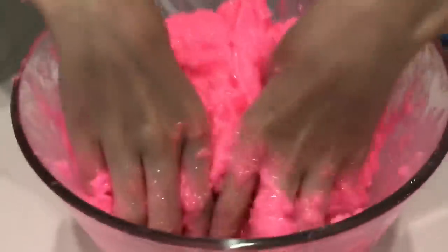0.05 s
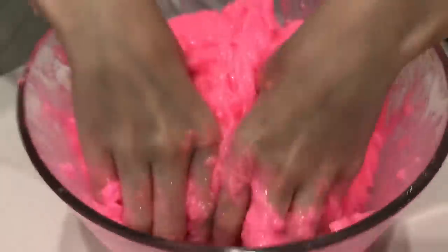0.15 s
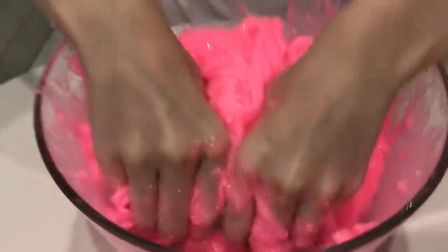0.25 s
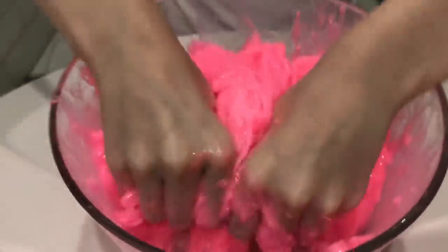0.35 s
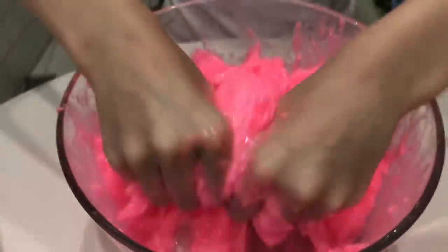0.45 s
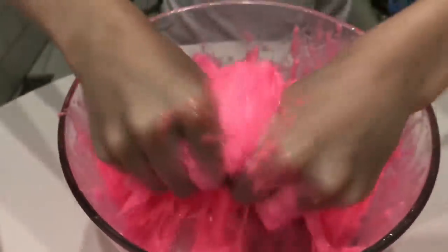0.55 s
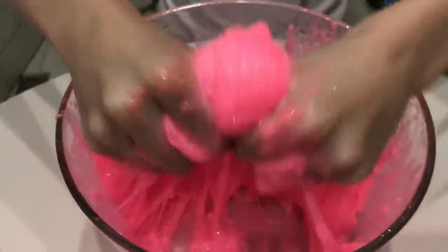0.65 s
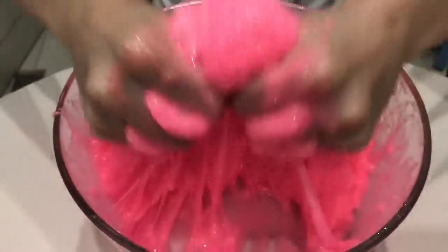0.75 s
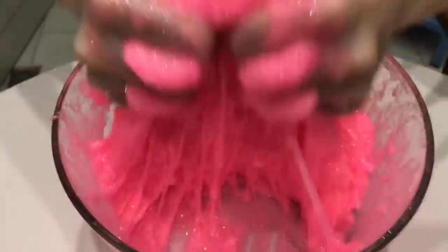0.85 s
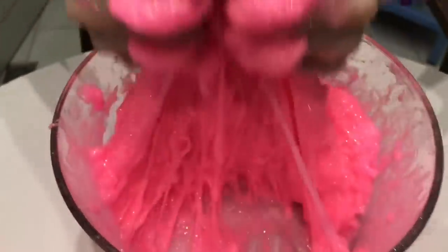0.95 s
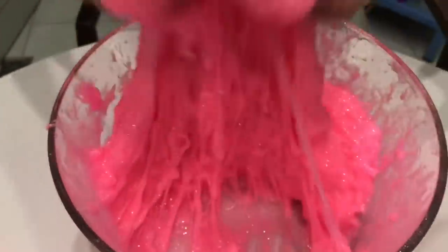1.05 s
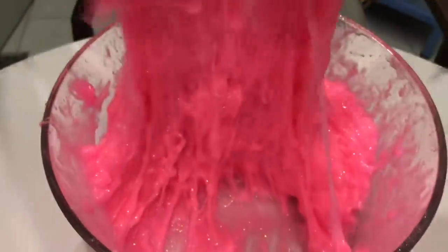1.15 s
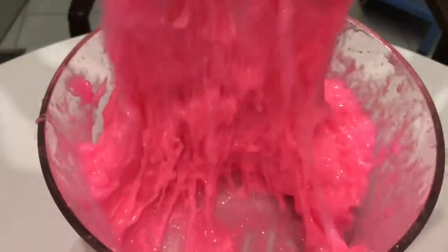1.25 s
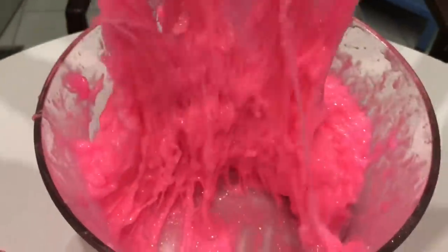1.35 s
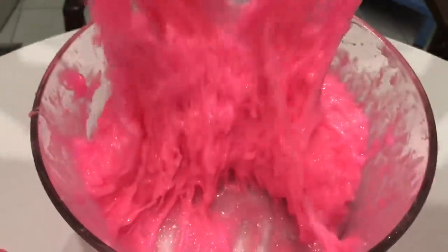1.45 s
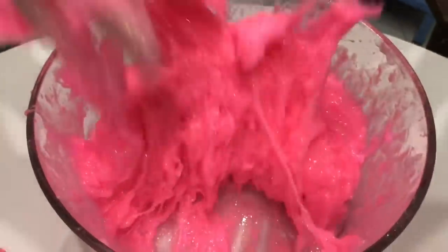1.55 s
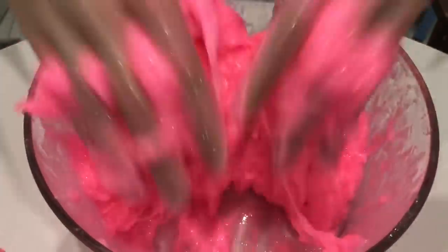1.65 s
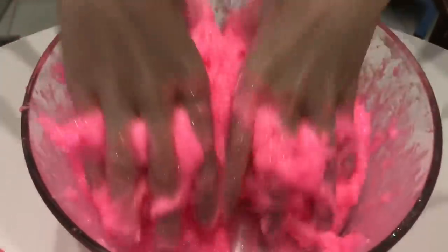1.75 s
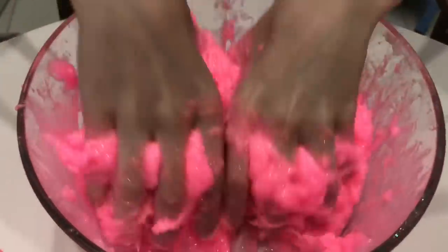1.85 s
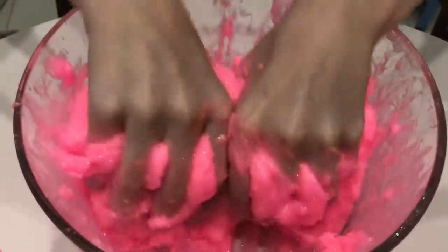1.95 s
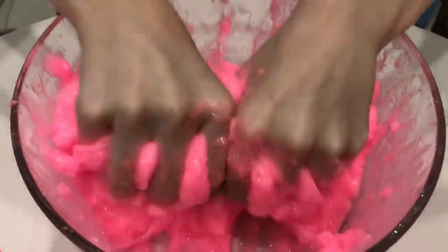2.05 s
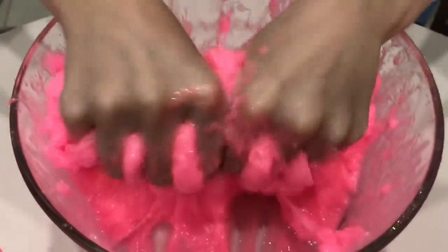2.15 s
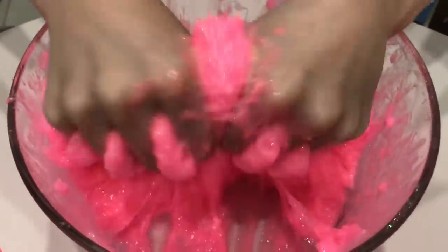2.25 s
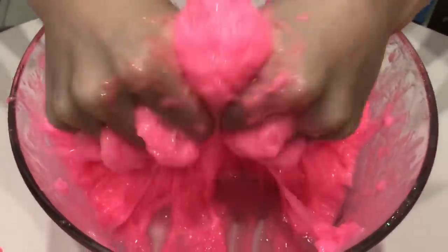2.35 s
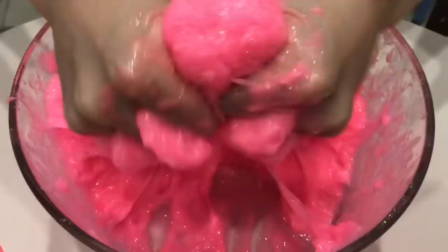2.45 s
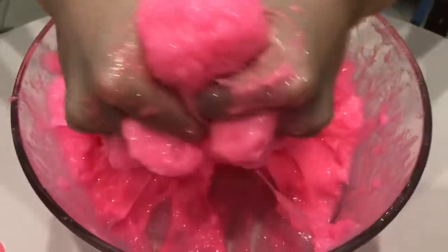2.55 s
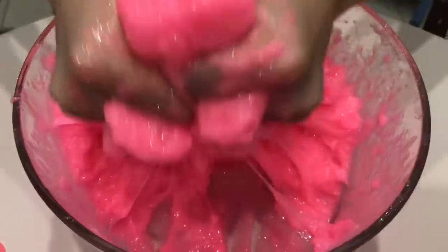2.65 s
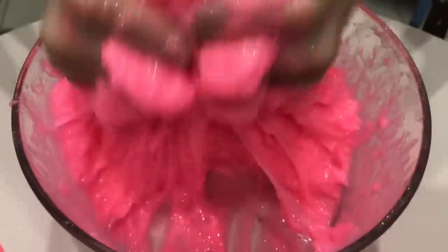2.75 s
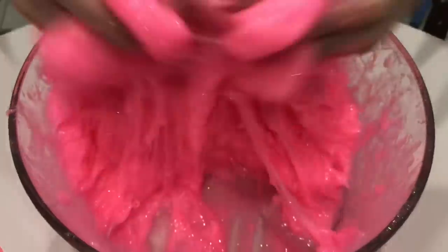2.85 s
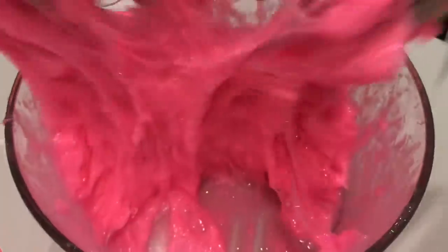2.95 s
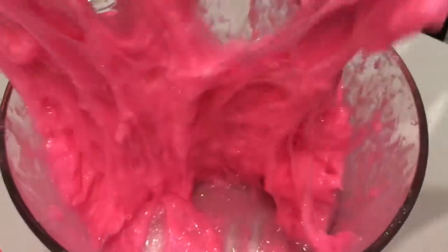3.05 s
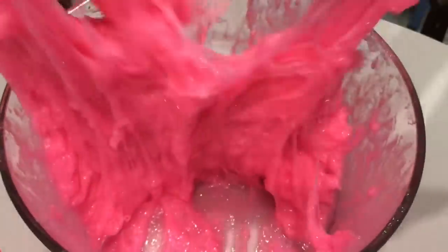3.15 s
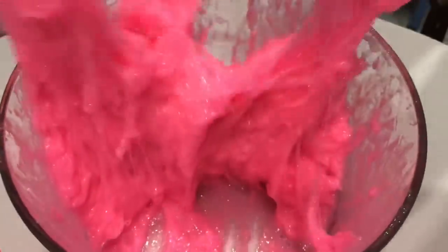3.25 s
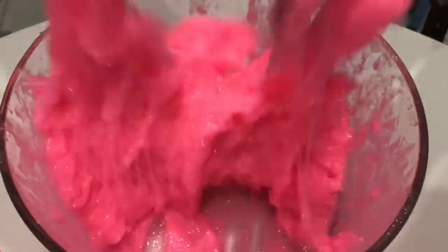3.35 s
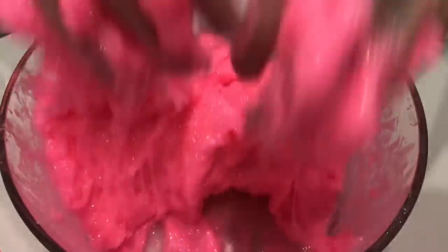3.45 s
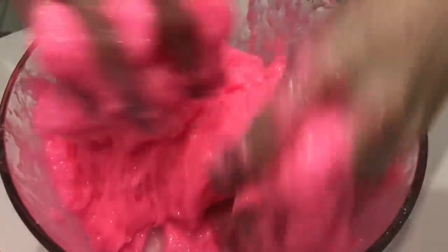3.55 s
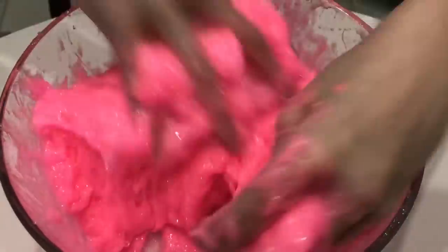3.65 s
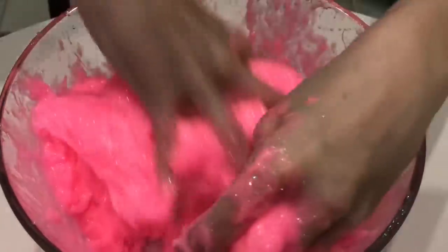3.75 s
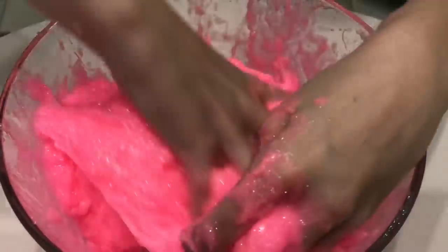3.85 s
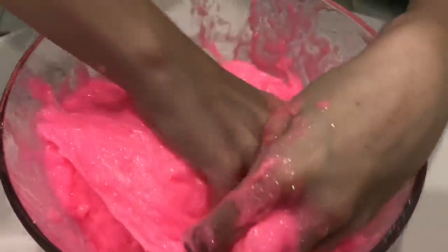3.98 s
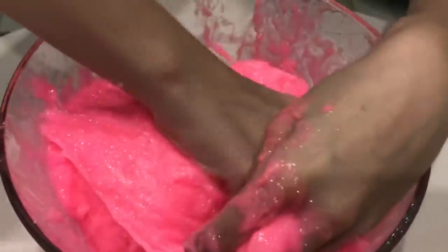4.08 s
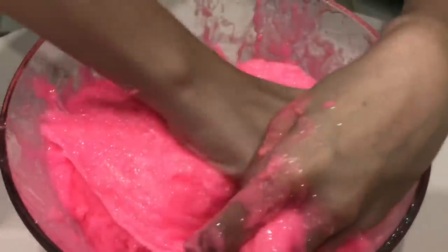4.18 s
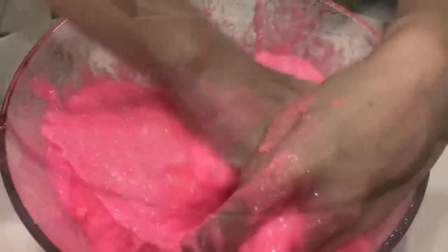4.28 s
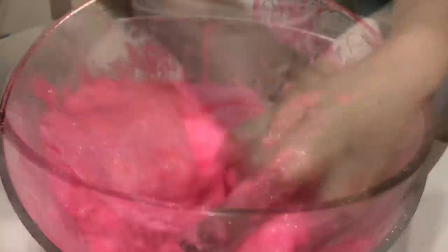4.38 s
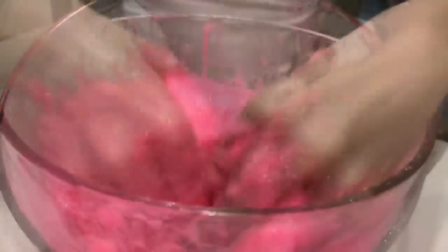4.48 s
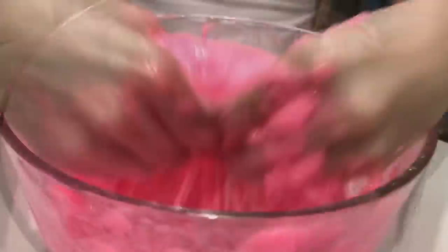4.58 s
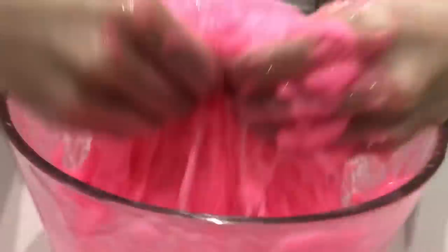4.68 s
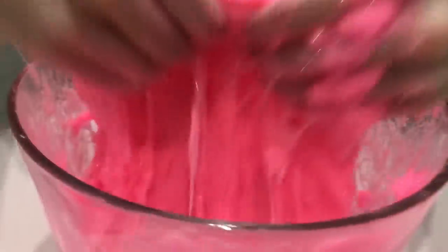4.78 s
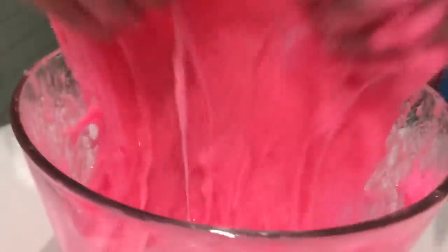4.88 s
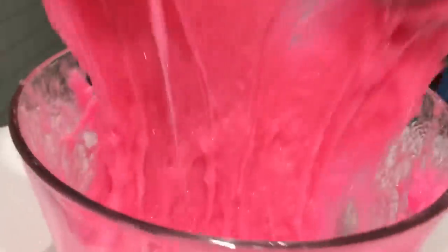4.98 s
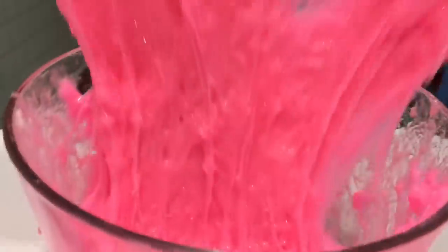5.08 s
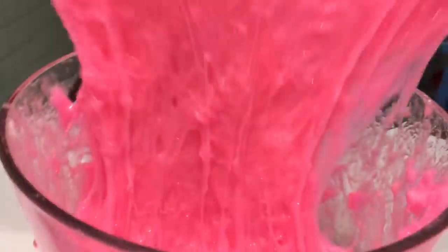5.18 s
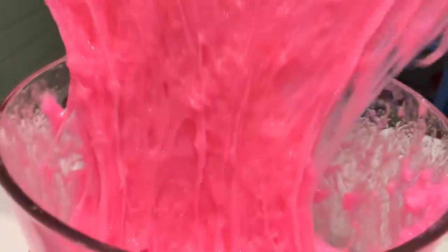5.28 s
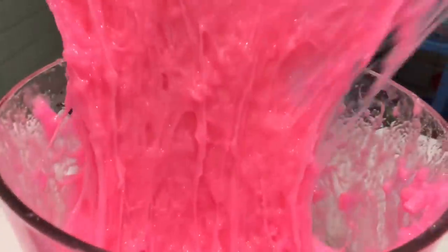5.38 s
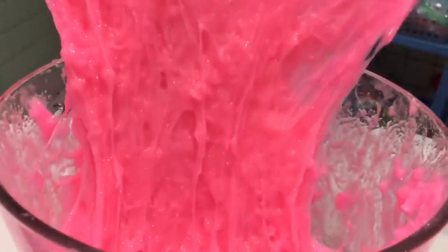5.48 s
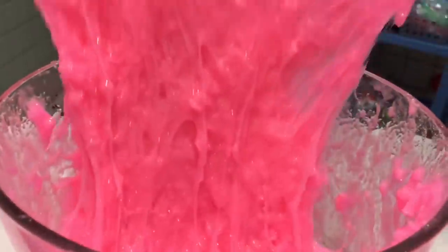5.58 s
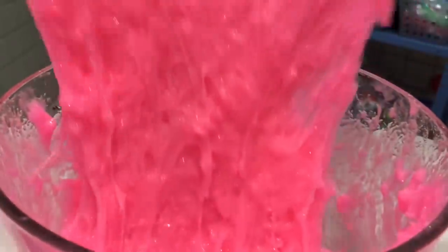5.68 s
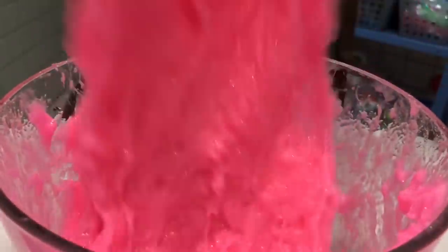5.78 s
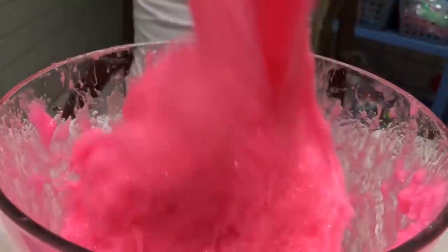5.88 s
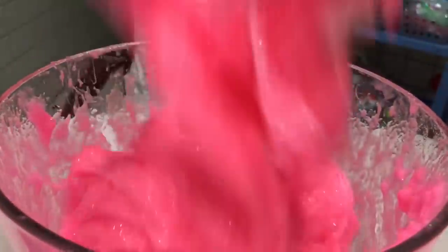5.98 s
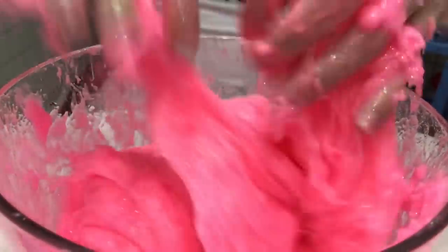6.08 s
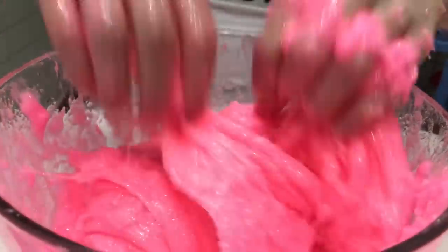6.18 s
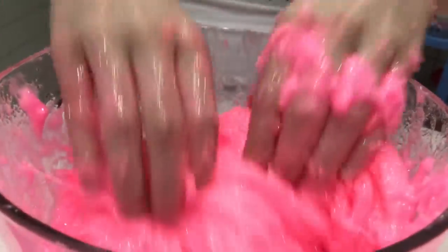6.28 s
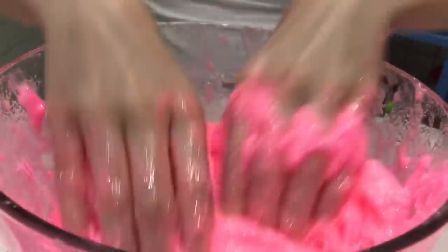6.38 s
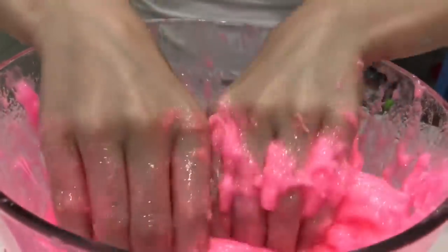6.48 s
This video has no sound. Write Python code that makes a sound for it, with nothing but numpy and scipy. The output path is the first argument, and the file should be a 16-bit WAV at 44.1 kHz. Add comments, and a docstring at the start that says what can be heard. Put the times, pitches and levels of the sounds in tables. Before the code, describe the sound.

Two hands knead thick slime in a large bowl, close to the microphone in a small room. Tiny bubbles crackle in waves with each squeeze, while trapped air bursts in wet pops and sticky threads tick apart. A soft thud comes as the lump is pushed down. Later a pull drags the bowl on the table with a low judder, then a loud pop leads into a last squeeze.

```python
"""Two hands squeeze, fold and stretch thick slime in a large bowl, close up in a small room.
From the start, trapped air bursts in wet pops that rattle between the bowl's walls, over a crackle
of tiny bubbles and the ticks of parting threads. At 1.9 s the lump is pushed down with a soft thud;
near 4 s the hands dig in again. Pulls drag the bowl on the table: it judders with a low groan, most
around 5 s. A loud pop at 6.2 s leads into a last squeeze."""
import sys
import numpy as np
from scipy import signal
from scipy.fft import rfft, irfft
from scipy.io import wavfile
from scipy.ndimage import uniform_filter1d

SR = 44100
rng = np.random.default_rng(int(sys.argv[2]) if len(sys.argv) > 2 else 0)


def transcribe(signal):
    """Save signal, clipped to [-1, 1], as a 16-bit WAV file at the path in sys.argv[1]."""
    frames = np.atleast_2d(signal).T
    limited = np.clip(frames, -1, 1)
    pcm = np.round(limited * 32767).astype(np.int16)
    wavfile.write(sys.argv[1], SR, pcm)


N = 287541
TIME_S = np.arange(N) / SR
BURST_S = 0.002  # pop and tick levels are averages over this time


def amp(db):
    return 10 ** (np.asarray(db) / 20)


def unit_rms(x):
    return x / np.sqrt(np.mean(x ** 2) + 1e-20)


def unit_energy(x):
    return x / np.sqrt(np.sum(x ** 2) + 1e-20)


def at_hz(points, hz):
    """Interpolates (Hz, value) rows on a log-frequency axis."""
    points_hz, values = np.transpose(points)
    return np.interp(np.log(hz + 1), np.log(points_hz + 1), values)


def coloured(x, points):
    return irfft(rfft(x) * amp(at_hz(points, np.fft.rfftfreq(len(x), 1 / SR))), len(x))


def highpass(x, hz):
    return signal.sosfilt(signal.butter(2, min(hz, SR / 3), "high", fs=SR, output="sos"), x)


def lowpass(x, hz):
    return signal.lfilter(*signal.butter(2, min(hz, SR * 3 / 7), fs=SR), x)


def wander(top_hz):
    """Slow noise of rms 1."""
    return unit_rms(irfft(rfft(rng.standard_normal(N)) * (np.fft.rfftfreq(N, 1 / SR) < top_hz), N))


def add(mix, start_s, sound):
    part = mix[max(round(start_s * SR), 0):][:len(sound)]
    part += sound[:len(part)]


def stroke(start_s, hold_s, attack_s, release_s):
    """Envelope of one hand move: rise, hold, decay."""
    t = TIME_S - start_s
    return np.clip(t / attack_s, 0, 1) * np.exp(-np.maximum(t - hold_s, 0) / release_s)


def background(air_db=-48, hum_hz=60, hum_db=-57):
    """Room air and faint mains hum."""
    # Each row: frequency in Hz, relative noise density in dB.
    air_spectrum = [(15, -36), (25, -8), (64, 0.5), (170, 0), (439, -9.5), (754, -22.5), (2000, -30),
                    (5570, -27), (16000, -42)]
    air = amp(air_db) * unit_rms(coloured(rng.standard_normal(N), air_spectrum))
    return air + amp(hum_db) * unit_rms(np.sin(2 * np.pi * hum_hz * TIME_S))


def room(x, gap_s=0.0025, echoes_per_s=5000, wall_s=0.0106, wall_db=-15, wall_cutoff_hz=1700):
    """One dull echo off the nearest wall, plus a sparse tail; each band decays at its own rate."""
    # Each row: frequency in Hz, time to fall 60 dB in seconds.
    t60 = [(500, 0.27), (3000, 0.33), (15000, 0.52)]
    # Each row: frequency in Hz, tail gain in dB.
    tail_colour = [(250, 1), (470, -11), (740, -8), (1100, -6.5), (3000, -11), (6000, -11.5),
                   (14000, -14.5)]
    size = SR // 2
    taps = rng.standard_normal(size) * (rng.random(size) < echoes_per_s / SR)
    taps *= np.arange(size) > gap_s * SR
    hz, t, bands = signal.stft(taps, SR, nperseg=256)
    bands *= amp(-60 * t / at_hz(t60, hz)[:, None])
    tail = unit_energy(signal.istft(bands, SR, nperseg=256)[1])
    out = signal.fftconvolve(x, coloured(tail, tail_colour))[:N]
    add(out, wall_s, amp(wall_db) * lowpass(x, wall_cutoff_hz))
    return out


def bowl_ring():
    """The bowl's damped modes after one small blow; energy 1."""
    # Each row: frequency in Hz, bandwidth in Hz, relative energy in dB.
    modes = [(164.5, 5.5, -9), (224.5, 16, -9), (252.5, 24, -4), (350.4, 3.5, -13.5), (593.6, 31, -13.5),
             (1100, 120, -20.5), (2373, 31, -20.5), (3410, 58, -26)]
    t = np.arange(SR // 2) / SR
    ring = sum(amp(db) * unit_energy(np.exp(-np.pi * width_hz * t) * np.sin(2 * np.pi * hz * t))
               for hz, width_hz, db in modes)
    return unit_energy(ring)


def thud(start_s=1.876, gain_db=-2, cutoff_hz=330):
    """The lump is pushed onto the bowl's bottom: a cushioned blow on its modes."""
    out = np.zeros(N)
    add(out, start_s, amp(gain_db) * lowpass(bowl_ring(), cutoff_hz))
    return out


def groan(slips_per_s=330, low_cut_hz=150, judder_hz=208, lock_db=-28, max_lock=0.72):
    """The bowl slips unevenly on the table and rings; a hard pull locks the slips into a judder."""
    # Each row: start in seconds, hold in seconds, level in dB of one push or pull.
    pulls = [(0.274, 0.088, -42.5), (0.44, 0.15, -38.5), (0.665, .06, -40), (0.857, 0.28, -40),
             (1.85, 0.077, -37.5), (2.987, 0.2, -41), (4.053, 0.12, -35.5), (4.321, 0.16, -38),
             (4.623, 0.84, -39), (4.793, 0.088, -31.5), (5.043, 0.067, -28.5), (5.146, 0.038, -23.5),
             (5.312, 0.11, -36.5)]
    pull = np.sqrt(sum((amp(db) * stroke(start_s, hold_s, attack_s=0.044, release_s=0.049)) ** 2
                       for start_s, hold_s, db in pulls))
    slips = (rng.random(N) < slips_per_s / SR) * rng.uniform(0.27, 1, N)
    body = signal.oaconvolve(slips, bowl_ring())[:N]
    body = highpass(highpass(body, low_cut_hz), low_cut_hz)
    body /= np.sqrt(uniform_filter1d(body ** 2, size=2600) + 1e-9)  # the pull alone sets the level
    wavering_hz = judder_hz * (1 + 0.05 * wander(top_hz=30))
    judder = unit_rms(np.sin(2 * np.pi * np.cumsum(wavering_hz) / SR))
    lock = max_lock * np.minimum(pull / amp(lock_db), 1)
    return pull * (np.sqrt(1 - lock) * body + np.sqrt(lock) * judder)


def bubble(hz, snap_db, snap_s=0.00044, ring_s=0.0003, ring_exponent=0.36, low_cut_ratio=0.5,
           wall_s=0.0024, wall_gain=0.47, rise=0.017, snap_cutoff_ratio=0.81, size=600, echoes=7):
    """One burst: the film snaps, the air pocket rings a few cycles, the bowl's walls echo both."""
    t = np.arange(size) / SR
    decay_s = ring_s * (hz / 2000) ** -ring_exponent  # small pockets die sooner
    fade = np.exp(-t / decay_s)
    pitch_hz = hz * (1 + rise * (1 - 2 * fade))  # climbs as the opening widens
    ring = np.sin(2 * np.pi * np.cumsum(pitch_hz) / SR) * fade
    ring = highpass(ring, low_cut_ratio * hz)  # a pocket radiates little below its pitch
    ring = lowpass(ring, 1.34 * hz)  # the film opens gradually
    snap = highpass(rng.standard_normal(size) * np.exp(-t / snap_s), np.clip(hz, 1500, 3200))
    pole = np.exp(-2 * np.pi * snap_cutoff_ratio * hz / SR)  # thick films on big pockets snap duller
    snap = signal.lfilter([1 - pole], [1, -pole], snap)
    echo_gain = wall_gain * min(1, 6000 / hz)  # tiny bubbles lie on top, far from the walls
    signs = rng.choice([-1, 1], echoes)
    delays = (rng.uniform(0.15, 1, echoes) * wall_s * SR).astype(int)
    walls = np.zeros(size)
    walls[delays] = echo_gain * signs
    walls[0] = 1
    ring = unit_energy(np.convolve(ring, walls)[:size])
    snap = unit_energy(np.convolve(snap, walls)[:size])
    return ring + amp(snap_db) * snap


def threads(gain_db=-3.7, pitch_hz=11300, scatter=0.13, low_cut_hz=1900):
    """Thicker sticky threads snap singly: dry ticks of similar high pitch."""
    # Each row: start in seconds, relative level in dB.
    ticks = [(0.095, -21.5), (0.179, -19), (0.2503, -22), (0.343, -28), (0.4482, -22.5), (0.5825, -28),
             (0.6984, -23.5), (0.988, -19), (1.1858, -20), (1.199, -19), (1.2027, -12), (1.212, -14),
             (1.288, -15), (1.3941, -22.5), (1.437, -40.5), (1.702, -25), (1.751, -26), (1.8264, -23),
             (1.909, -20.5), (1.993, -19), (2.1614, -15), (2.3396, -14), (2.3878, -14), (2.442, -15),
             (2.5474, -23.5), (2.9204, -12.5), (2.978, -12), (3.4285, -37), (3.803, -23), (3.835, -17.5),
             (3.843, -18), (4.0621, -12), (4.1576, -21), (4.53, -23.5), (4.642, -25.5), (5.06, -27.5),
             (5.173, -22.5), (5.422, -23.5), (5.589, -30), (5.616, -17.5), (5.6736, -25), (5.845, -30),
             (5.8753, -27), (5.908, -27.5), (5.98, -35), (6.032, -32), (6.484, -23)]
    out = np.zeros(N)
    for start_s, db in ticks:
        hz = pitch_hz * rng.uniform(1 - scatter, 1 + scatter)
        add(out, start_s, amp(db + gain_db) * np.sqrt(BURST_S * SR) * bubble(hz, snap_db=-5))
    return highpass(out, low_cut_hz)


def swarm(level_db, low_hz, high_hz, per_s, spread_db, clump_db, snap_db, pitches=28):
    """Many small bursts of random strength, swelling in clumps."""
    out = np.zeros(N)
    for hz in np.geomspace(low_hz, high_hz, pitches):
        count = round(per_s / pitches * N / SR)
        when, luck, sign = rng.random(size=(2000, 3))[:count].T
        gains = amp(spread_db * np.minimum(-np.log(luck), 4)) * np.sign(sign - 0.5)
        burst = bubble(hz, snap_db)
        places = (when * N).astype(int)[:, None] + np.arange(len(burst))
        out += np.bincount(places.ravel(), np.outer(gains, burst).ravel(), N)[:N]
    return amp(level_db) * unit_rms(out * amp(clump_db * wander(top_hz=35)))


def with_squishes_db(base_db, hz, falloff_db_per_octave=8):
    """Bubble level near one pitch: the base plus patches of foam collapsing in a rush."""
    # Each row: start in seconds, hold in seconds, level in dB, typical bubble pitch in Hz.
    squishes = [(0.285, 0.031, -49, 1100), (0.376, 0.12, -41.5, 4000), (0.697, 0.027, -29.5, 9500),
                (0.702, 0.03, -37, 900), (1.193, .1, -31, 6000), (1.804, 0.035, -26, 7950),
                (1.975, 0.32, -41, 11500), (2.334, 0.07, -46, 8000), (2.422, 0.019, -20, 2110),
                (2.929, 0.065, -25, 3260), (3.777, 0.22, -41.5, 11500), (4.072, 0.066, -29, 9000),
                (4.091, .06, -32, 1200), (5.56, 0.061, -46, 12000), (6.298, 0.15, -43.5, 12000)]
    power = amp(base_db) ** 2
    for start_s, hold_s, db, typical_hz in squishes:
        gain = amp(db - falloff_db_per_octave * abs(np.log2(hz / typical_hz)))
        power += (gain * stroke(start_s, hold_s, attack_s=0.009, release_s=0.02)) ** 2
    return 10 * np.log10(power)


def kneading():
    """Squeezing bursts small bubbles of three sizes; fine threads tick as they leave the fingers."""
    # Each row: time in seconds, hand effort in dB (0 is a firm squeeze).
    effort = [(0, -4), (0.24, -8), (0.4, -1.5), (0.92, -2), (1.05, -5.5), (1.3, -4), (1.48, -8),
              (1.72, -7.5), (1.9, 0.5), (2.48, -2.5), (2.64, -9.5), (2.8, -10.5), (3.03, -2.5),
              (3.26, -6.5), (3.4, -15), (3.65, -13.5), (3.85, -2.5), (4.48, -1), (4.6, -9), (5.4, -7.5),
              (5.99, -12), (6.52, 1)]
    # Each row: frequency in Hz, gain in dB.
    colour = [(450, -0.5), (750, -0.5), (1700, -0.5), (2800, 1.5), (5500, 1.5), (7400, -6), (9300, 3),
              (10500, -5), (11700, 5), (15500, 2.5)]
    effort_db = np.interp(TIME_S, *np.transpose(effort))
    squelch_db = with_squishes_db(-42.5 + 0.86 * effort_db, hz=1070)
    crackle_db = with_squishes_db(-39.5 + 1.25 * effort_db, hz=3980)
    fizz_db = with_squishes_db(-45.5 + 0.8 * effort_db, hz=11700)
    ticks_db = 0.72 * fizz_db - 13  # threads keep parting while the hands rest
    squelch = swarm(squelch_db, 594, 2010, per_s=900, spread_db=-0.5, clump_db=3.5, snap_db=-5)
    crackle = swarm(crackle_db, 2340, 6860, per_s=2400, spread_db=5, clump_db=3, snap_db=-8.5)
    fizz = swarm(fizz_db, 7470, 14400, per_s=1300, spread_db=5.5, clump_db=3, snap_db=-7)
    ticks = swarm(ticks_db, 4200, 10300, per_s=26, spread_db=3, clump_db=1, snap_db=0)
    return coloured(squelch + crackle + fizz + ticks, colour)


def pops(gain_db=1.45, low_cut_hz=500):
    """Large air pockets burst singly on top of the lump, where the bowl's walls echo less."""
    # Each row: start in seconds, relative ring level in dB, pitch in Hz, snap in dB over the ring.
    pockets = [(0.291, -15, 1570, -13), (0.295, -17.5, 1020, -3.5), (0.3759, -20.5, 4240, -3),
               (0.6122, -8, 2500, -8.5), (0.7036, -20, 5000, -12), (0.7142, -19.5, 550, -12),
               (0.827, -26, 5900, -16), (0.9278, -26, 3600, -9), (1.1057, -25.5, 4550, -10),
               (1.2491, -11, 4900, -2.5), (1.8753, -20, 690, -1), (1.9783, -26, 2860, 5),
               (2.0411, -16, 850, -7), (2.0758, -33, 4430, 12), (2.17, -16.5, 710, -8),
               (2.1925, -16, 610, 0), (2.193, -12.5, 3260, -9.5), (2.3383, -25, 635, -5),
               (2.3437, -15.5, 5500, -9), (2.3579, -12, 3214, -6), (2.359, -15, 1270, -24),
               (2.363, -16, 2960, -8), (2.435, -14, 1770, -8), (2.4409, -12.5, 2250, -25),
               (2.6605, -20, 2250, -8.5), (2.8132, -18.5, 2320, -4), (2.9468, -20, 3380, -3),
               (2.9634, -16, 3600, 0), (3.067, -28, 2920, 5), (3.112, -22, 8740, -20),
               (3.667, -24.5, 3160, -34), (3.69, -22.5, 8150, -16), (3.9433, -21.5, 825, -4),
               (3.9882, -24, 5430, 8), (4.0772, -16, 4540, 7.5), (4.1206, -18.5, 5030, 2.5),
               (4.127, -19.5, 4760, 3), (4.256, -24, 1760, 3.5), (4.322, -23.5, 1530, -4.5),
               (4.3981, -23.5, 2670, 6), (4.4335, -14.5, 4000, -10), (4.496, -25.5, 3700, -20),
               (4.6094, -29.5, 4770, 8), (4.7485, -24.5, 3730, -6), (4.8177, -25.5, 3900, -32),
               (4.981, -29.5, 1350, -1), (5.2167, -25.5, 1310, -0.5), (5.2324, -17, 5700, -24),
               (5.3236, -12.5, 6000, -22), (5.7748, -19, 5730, -10), (6.1766, -25, 4630, -17),
               (6.2078, -5, 1000, -19.5), (6.415, -28, 5370, -15), (6.437, -31.5, 5700, -1)]
    out = np.zeros(N)
    for start_s, db, hz, snap_db in pockets:
        burst = bubble(hz, snap_db, ring_s=0.00037, ring_exponent=0.61, low_cut_ratio=0.64,
                       wall_gain=0.3, snap_cutoff_ratio=0.8)
        add(out, start_s, amp(db + gain_db) * np.sqrt(BURST_S * SR) * burst)
    return highpass(out, low_cut_hz)


def scene():
    """Mono mix: slime with its room echo, bowl, background."""
    slime = pops() + threads() + kneading()
    return (slime + room(slime) + groan() + thud() + background())[None]


def record(dry, cutoff_hz=16000):
    """Clips peaks at full scale, then limits the band."""
    band_limit = signal.firwin(255, cutoff_hz, window=("kaiser", 8), fs=SR)
    return signal.oaconvolve(np.clip(dry, -1, 1), band_limit[None], "same")


dry = scene()
out = record(dry)
transcribe(out)
```